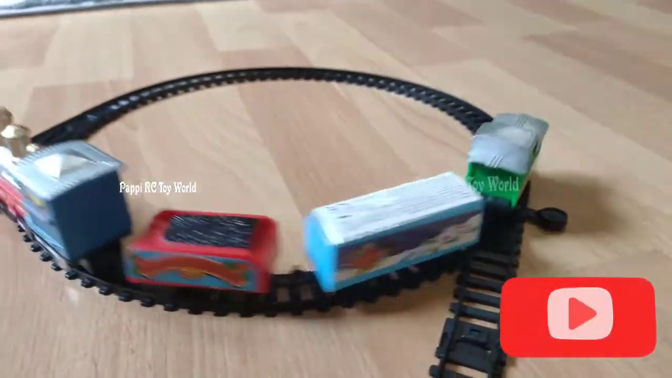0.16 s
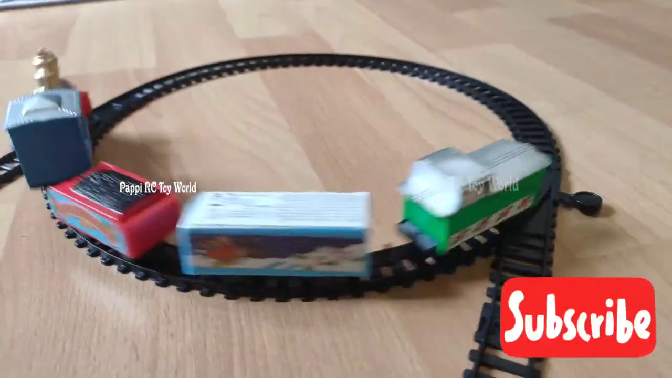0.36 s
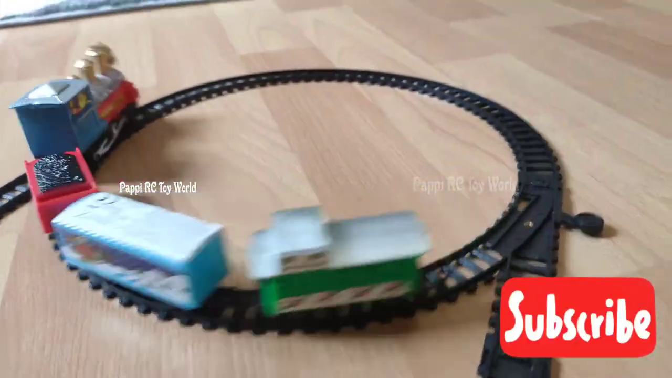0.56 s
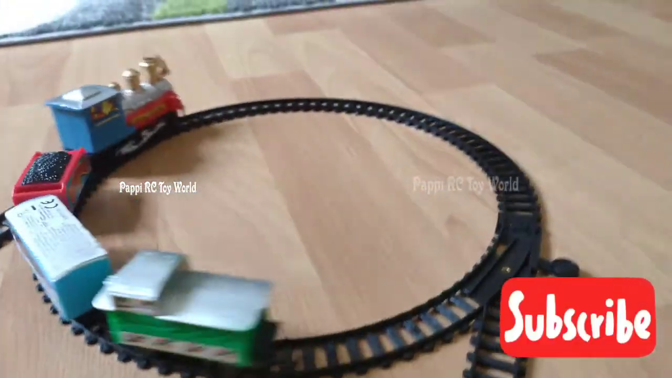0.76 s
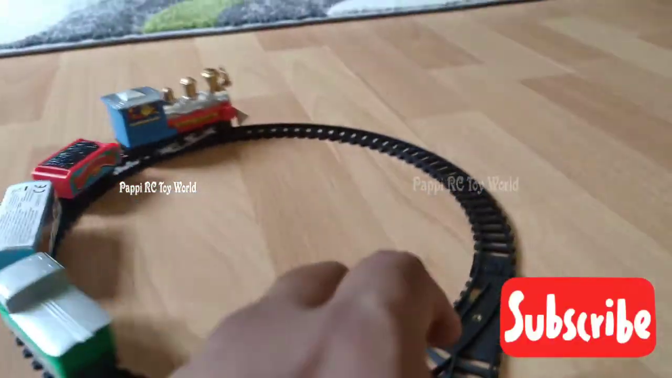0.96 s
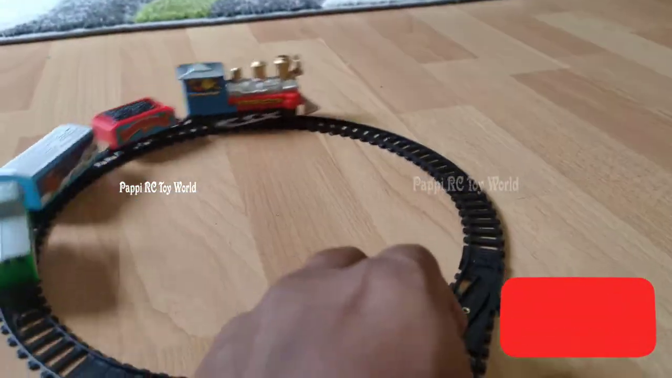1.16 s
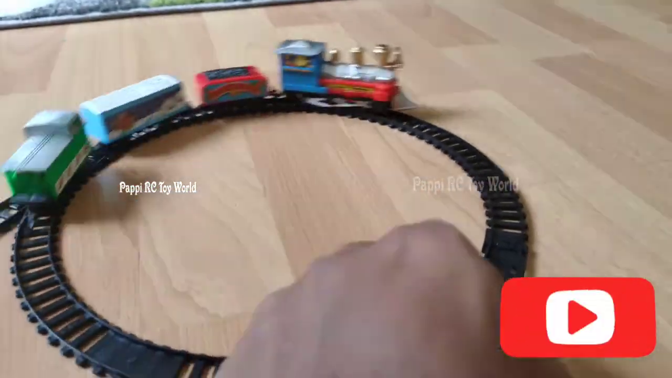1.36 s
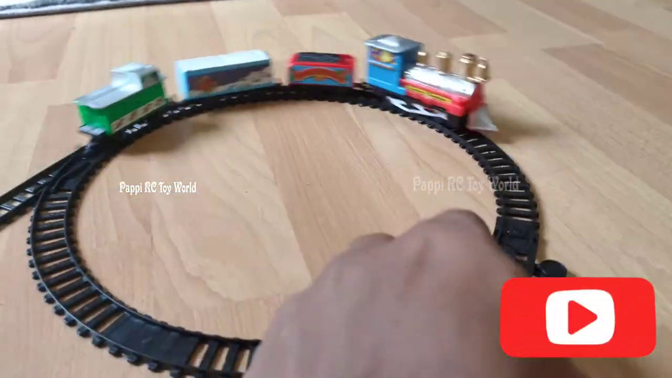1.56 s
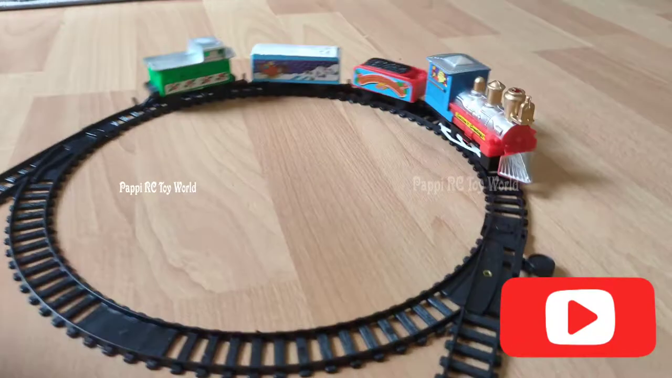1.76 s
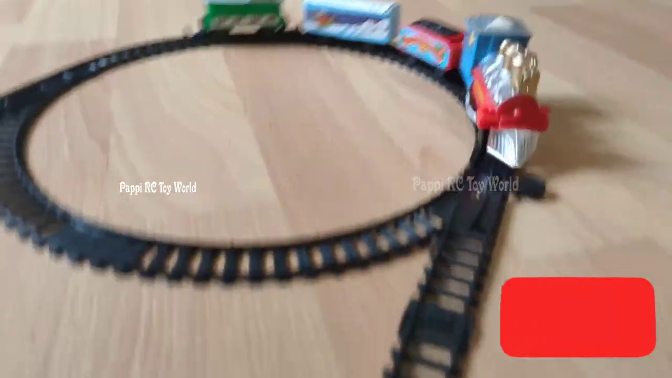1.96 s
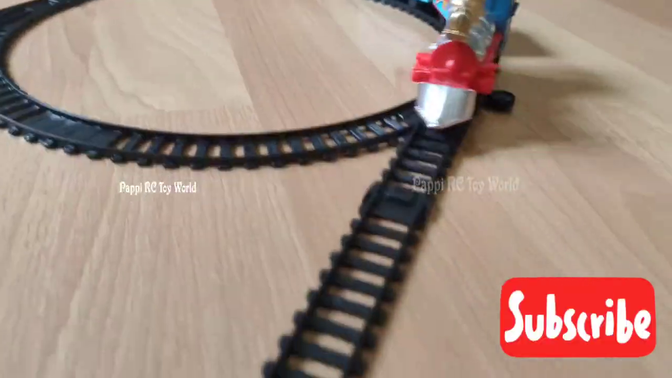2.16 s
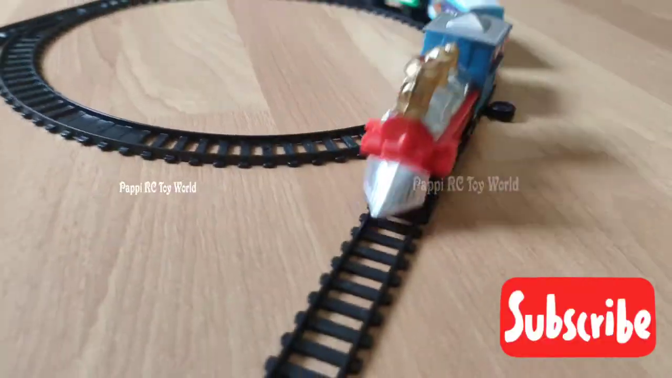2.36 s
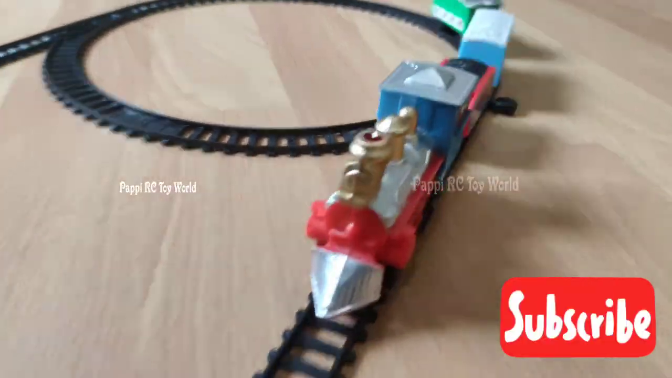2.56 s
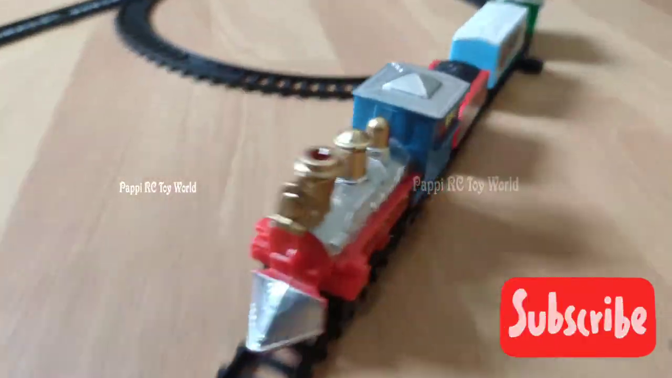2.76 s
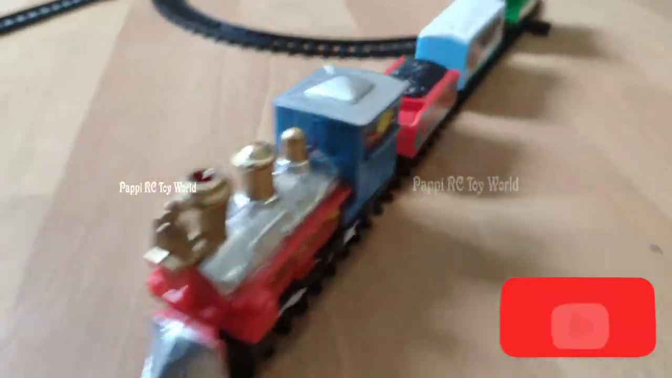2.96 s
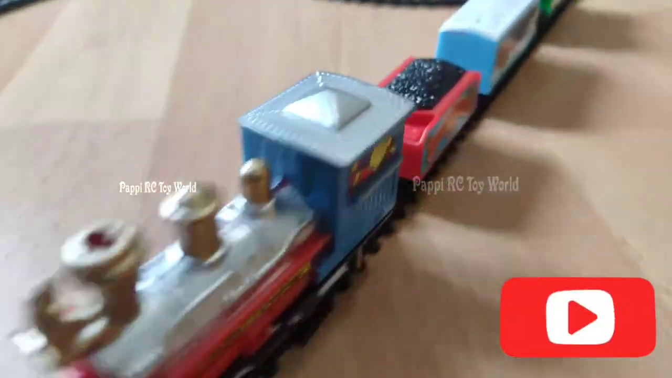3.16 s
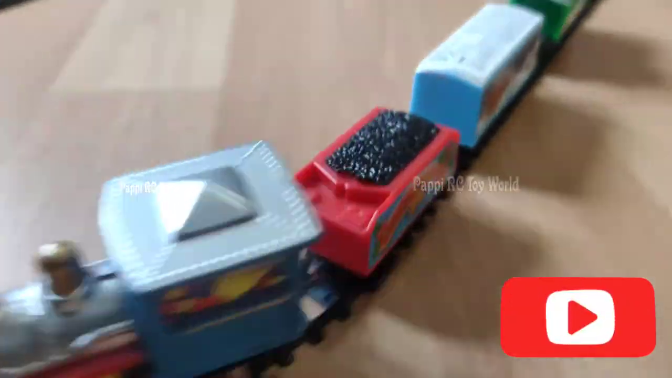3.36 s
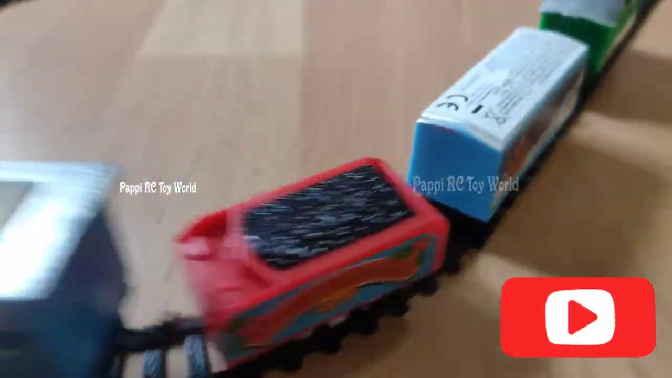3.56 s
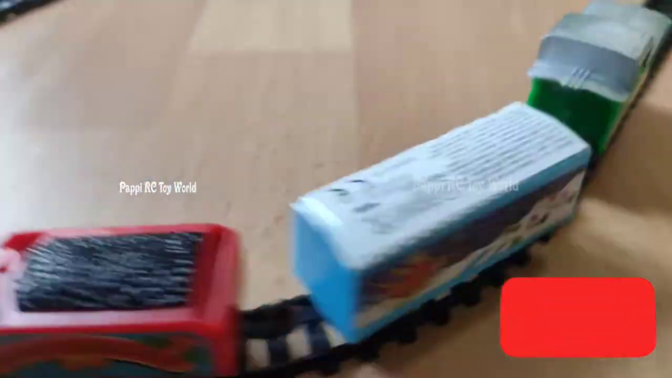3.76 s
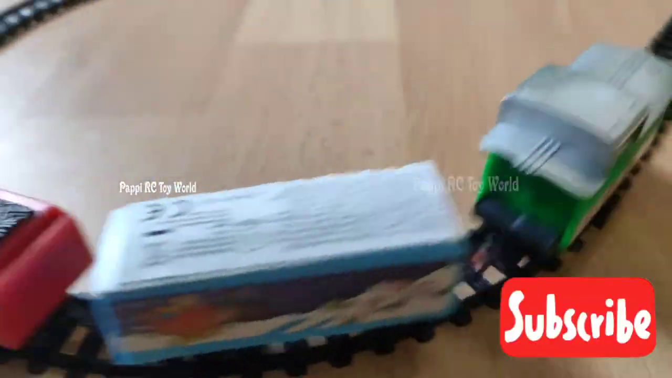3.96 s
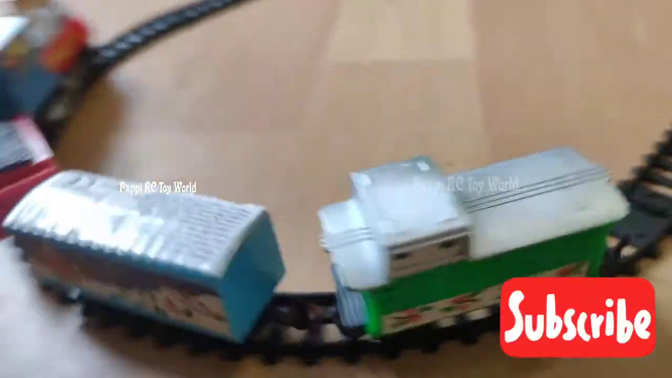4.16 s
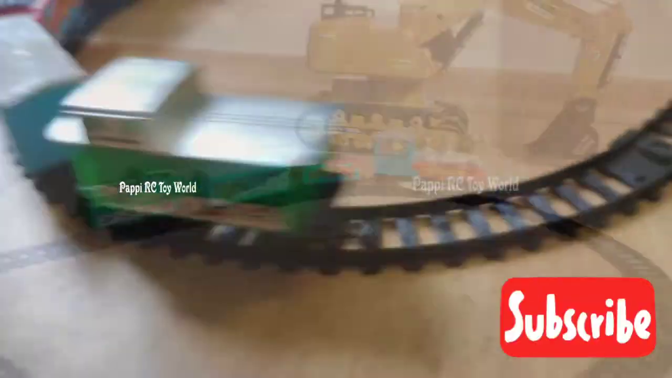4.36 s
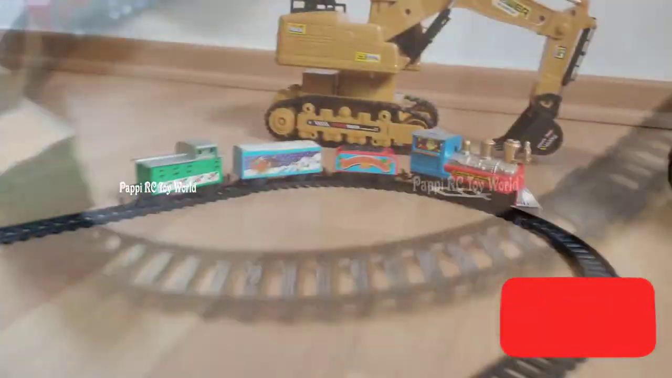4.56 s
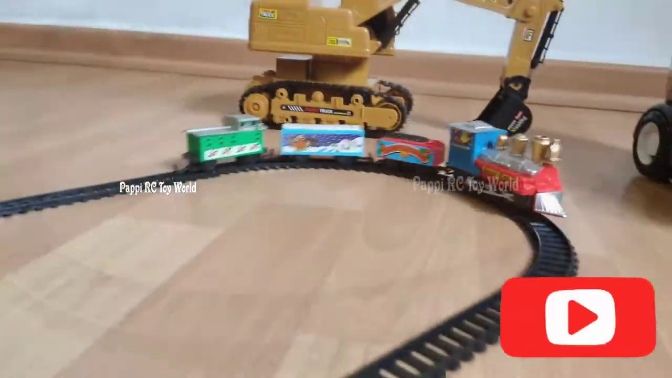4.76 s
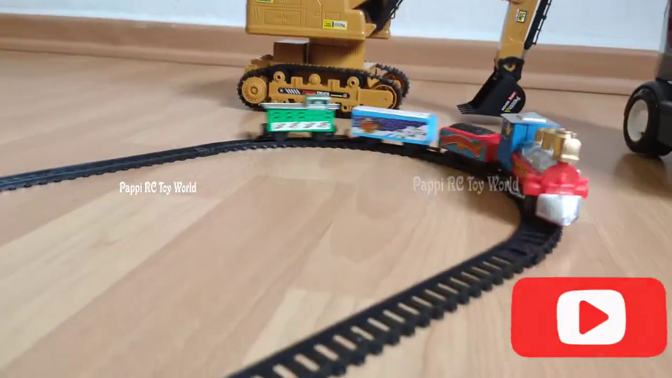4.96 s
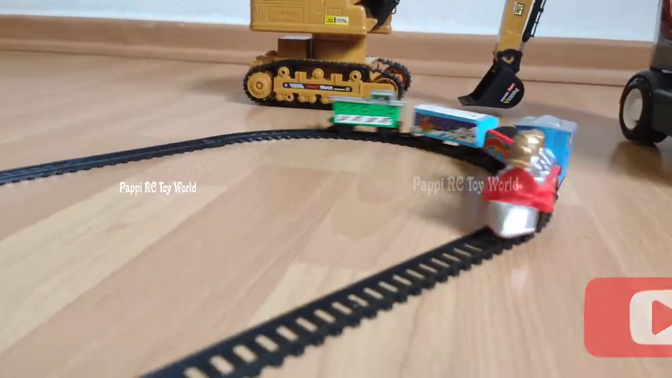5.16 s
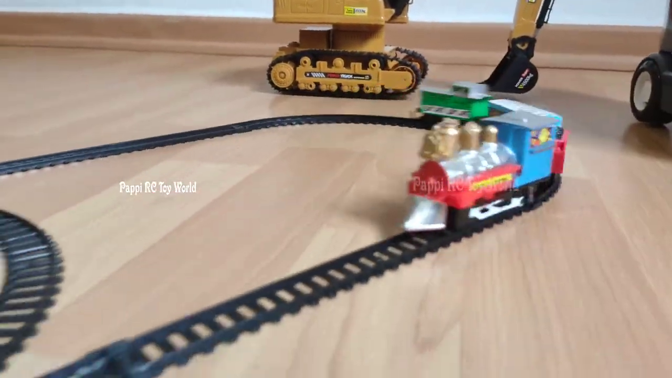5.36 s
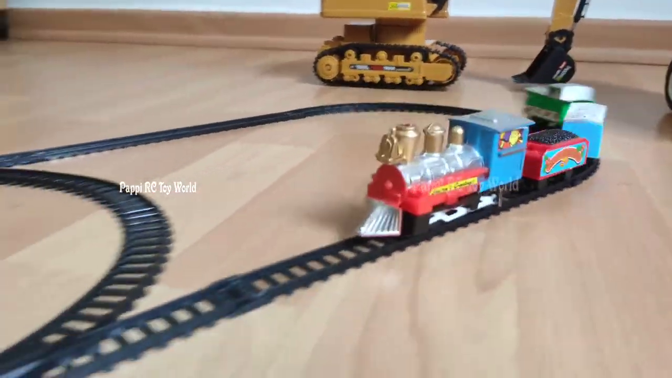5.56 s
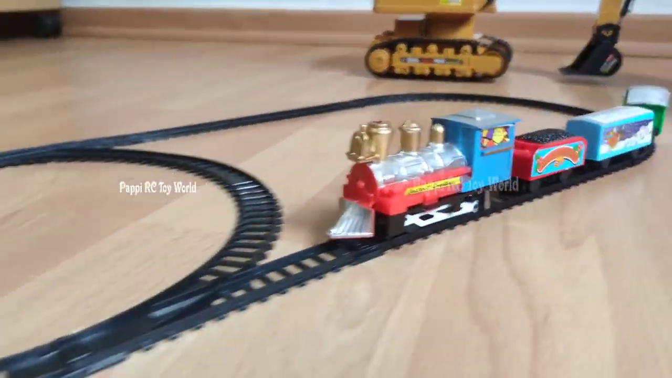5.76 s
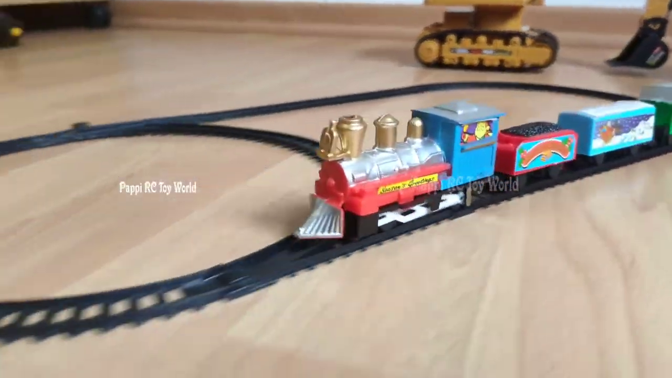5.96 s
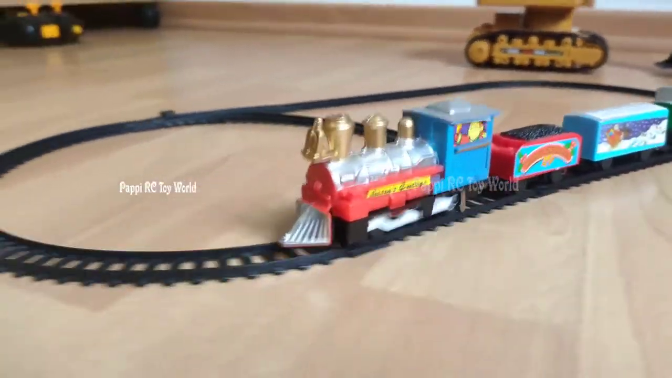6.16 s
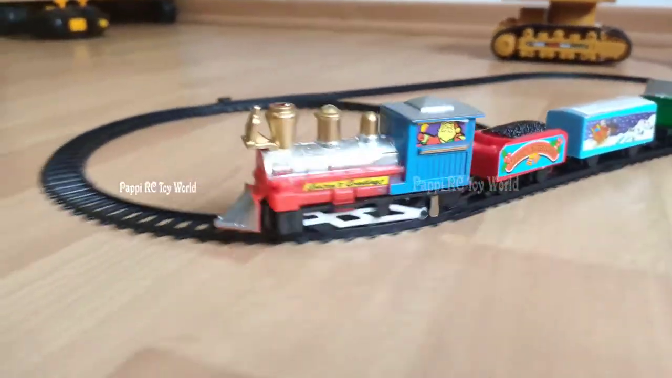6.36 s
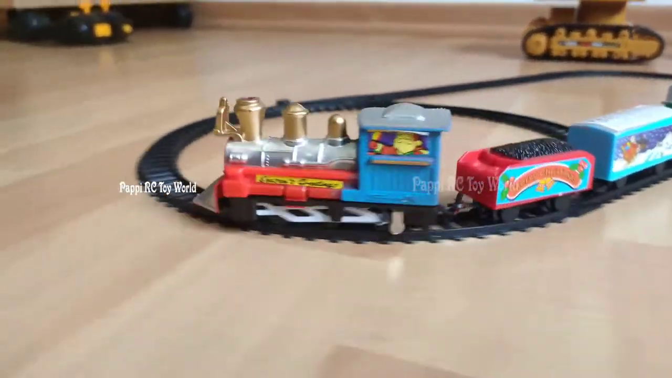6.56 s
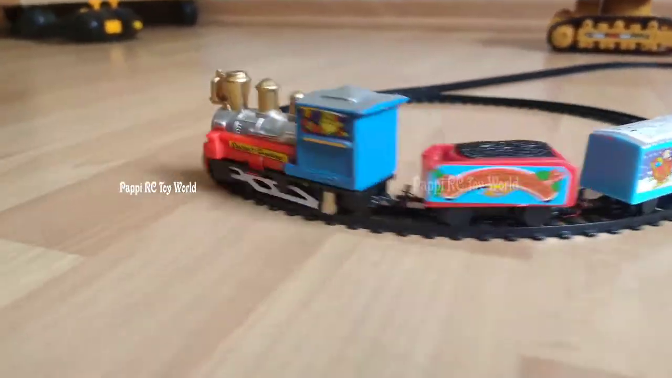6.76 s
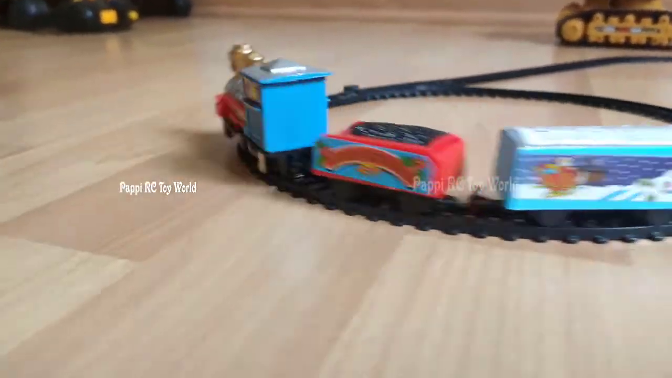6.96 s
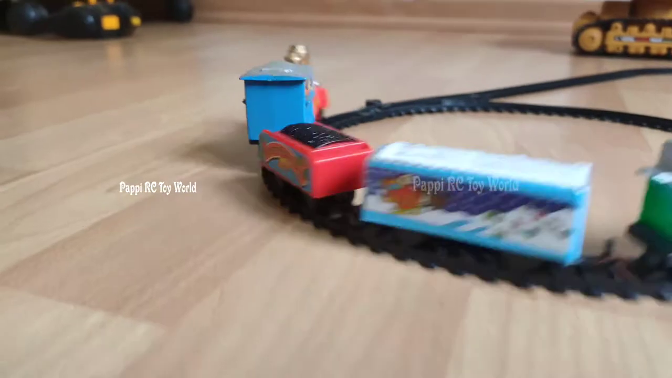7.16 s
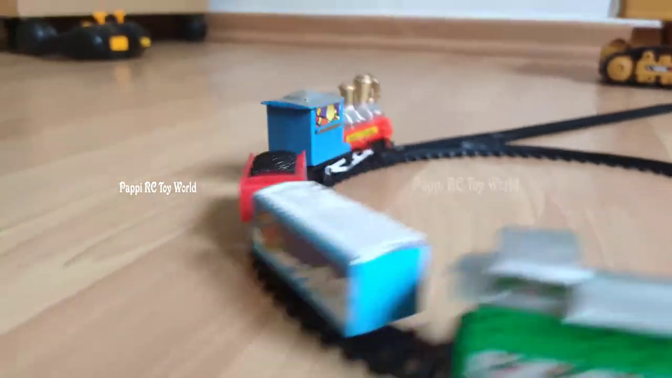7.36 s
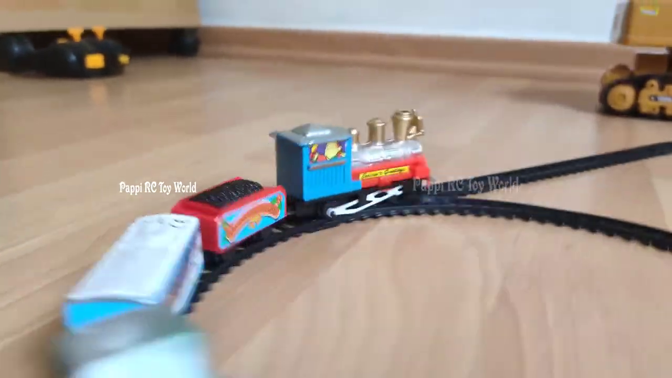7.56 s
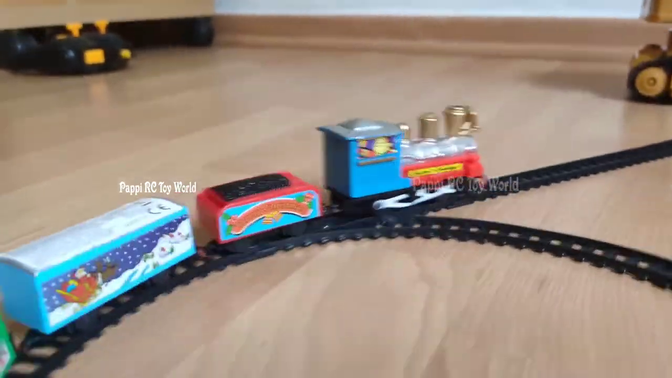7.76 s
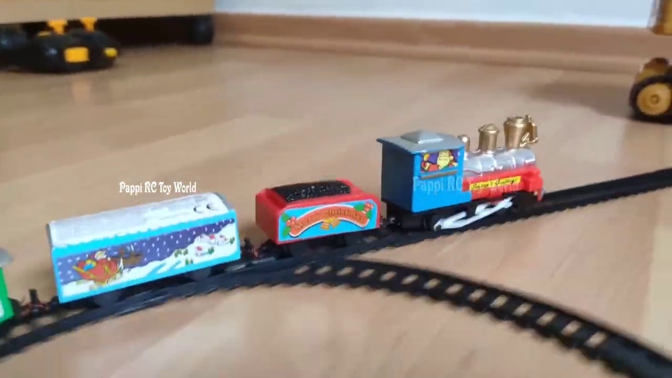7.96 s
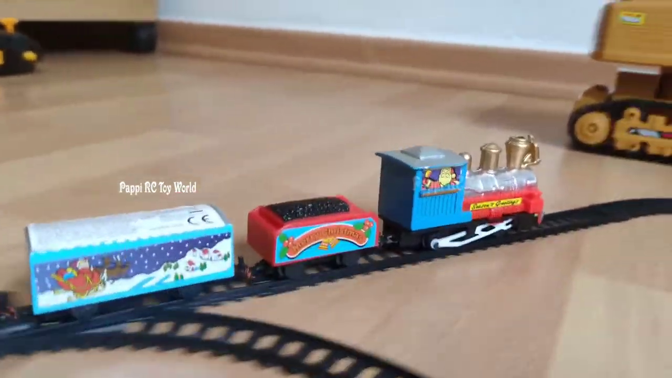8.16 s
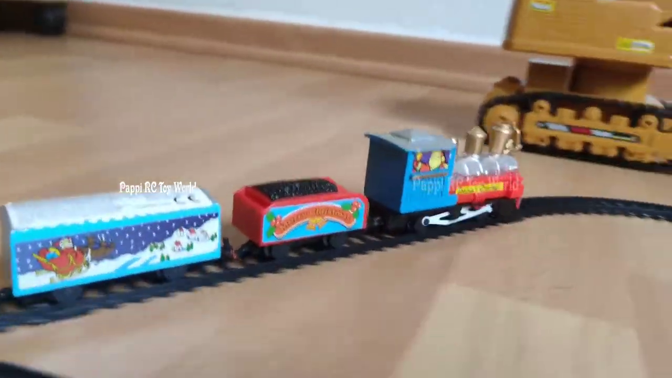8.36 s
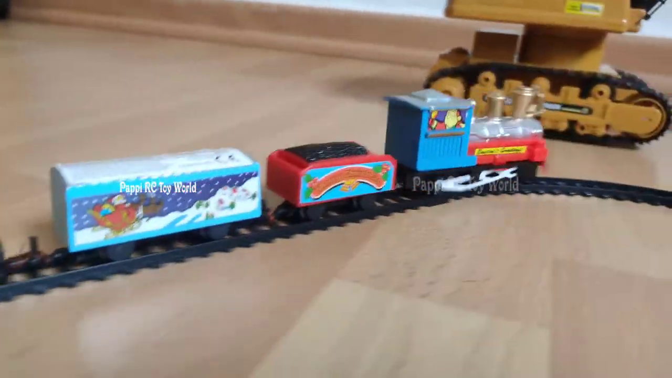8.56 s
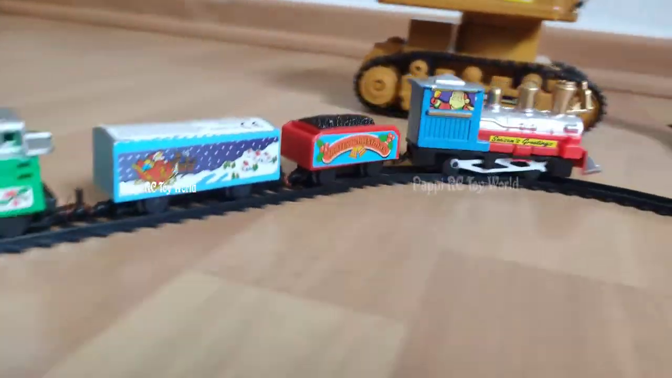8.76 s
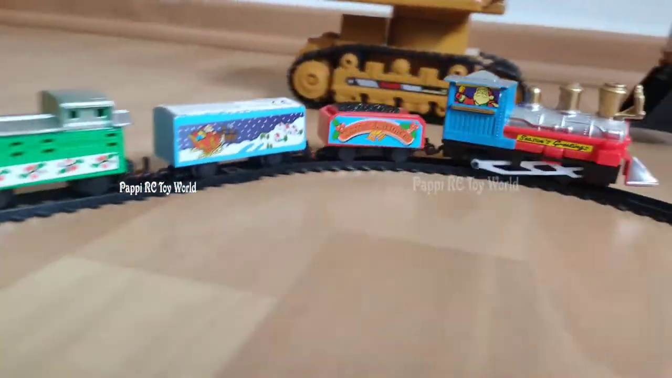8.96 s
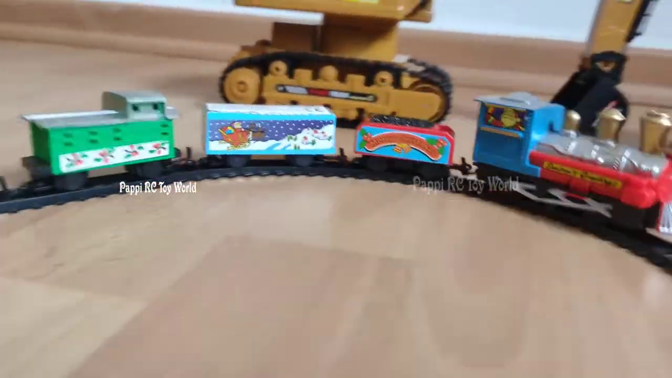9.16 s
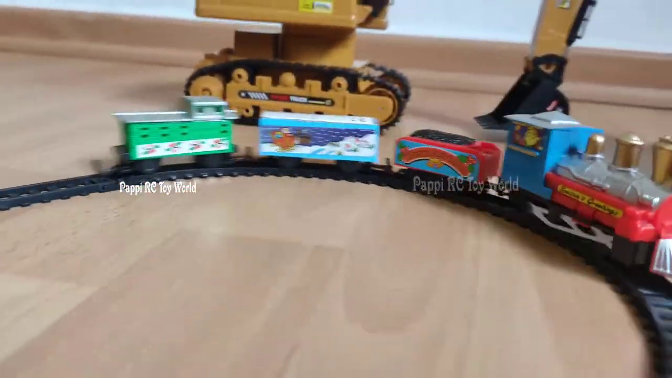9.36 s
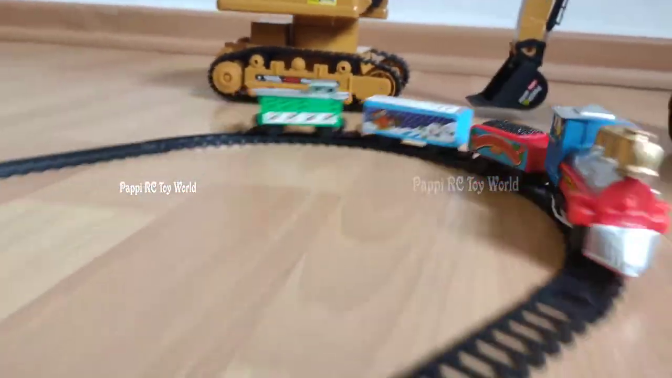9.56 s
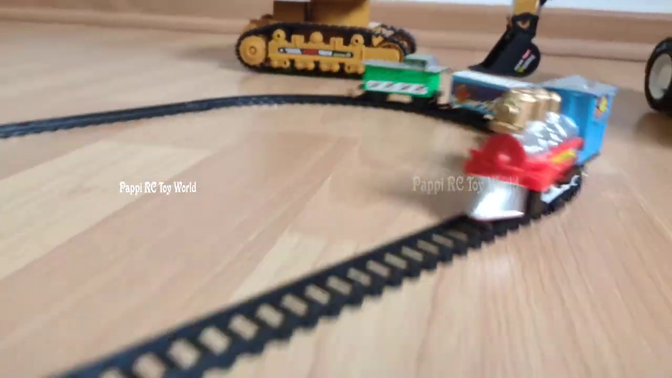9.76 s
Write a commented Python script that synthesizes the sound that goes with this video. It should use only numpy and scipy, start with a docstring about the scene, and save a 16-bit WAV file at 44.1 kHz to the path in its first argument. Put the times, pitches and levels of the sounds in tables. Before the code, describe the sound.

Close handheld phone pickup of a battery toy locomotive pulling light wagons. Fast dry gear rattle and skittering wheels dominate, thin at first with faint floor bumps, then closer and louder around three to four seconds, with tiny squeaks. Later, track and boards drum more fully under clusters of plastic clacks, with short room reflections and almost no background noise.

```python
"""A laminate floor in a small room: a battery toy train circles on plastic track close to a phone.
Gear teeth and loose rods, as trains of impacts, excite the resonances of the hollow engine.
Wheels clack over joints as bursts of bounces and flanges chirp in short noise grains; rolling
drums track, wagons and boards, and soft blows knock the floor. Diffuse echoes and faint air
noise surround it at two microphone ports."""
import sys
import numpy as np
from scipy import signal
from scipy.fft import rfft, irfft, next_fast_len
from scipy.io import wavfile
from scipy.ndimage import uniform_filter1d

SR = 44100
rng = np.random.default_rng(int(sys.argv[2]) if len(sys.argv) > 2 else 0)


def materialize(psi):
    """Save the field psi as 16-bit PCM at rate SR to the path in sys.argv[1].

    A 1-D psi becomes a single channel; in a 2-D psi each row is a channel.
    """
    bounded = np.clip(np.atleast_2d(psi).T, -1, 1)
    quanta = np.round(bounded * 32767).astype(np.int16)
    wavfile.write(sys.argv[1], SR, quanta)


N = 433062
TIME = np.arange(N) / SR

# resonances of the engine: pitch_hz, width_hz, relative_db
SHELL_MODES = [(1719, 64, -9), (2352, 120, -4.5), (1760, 4100, -9.5)]
GEARBOX_MODES = [(2426, 420, -2.5), (2950, 220, -1.5), (3564, 420, -2.5), (4600, 920, -9)]


def undb(db):
    """Decibels to gain."""
    return np.exp(np.asarray(db) * (np.log(10) / 20))


def unit(x):
    """Scale to rms 1."""
    return x / np.sqrt(np.mean(x ** 2))


def curves(table):
    """Each column after the first, interpolated over time."""
    s, *columns = np.transpose(table)
    return [np.interp(TIME, s, column) for column in columns]


def walk(rate_hz):
    """Smooth random signal of rms 1 with rate_hz new values a second."""
    hold = max(int(SR / rate_hz), 1)
    steps = np.repeat(rng.standard_normal(N // hold + 1), hold)
    return unit(uniform_filter1d(steps, hold)[:N])


def sway(rate_hz):
    """Random signal of rms 1, softly limited like a part with little play."""
    return unit(np.tanh(walk(rate_hz)))


def add(out, start_s, sound):
    """Mix a sound in at start_s."""
    i = max(int(start_s * SR), 0)
    out[i:i + len(sound)] += sound[:N - i]


def blend(dull, ringing, ratio_db):
    """Mix two sounds at a ratio in dB, keeping total power."""
    return (unit(dull) + undb(ratio_db) * unit(ringing)) / np.hypot(1, undb(ratio_db))


def colour(x, points, share=1):
    """Shape by a spectrum of (Hz, dB) points, its dB scaled by share."""
    hz, db = np.transpose(points)
    size = next_fast_len(N)
    f = np.maximum(np.fft.rfftfreq(size, 1 / SR), 1)
    gain_db = share * np.interp(np.log(f), np.log(hz), db)
    return irfft(rfft(x, size) * undb(gain_db), size)[:N]


def band_pass(order, low_hz, high_hz):
    """Butterworth band-pass sections."""
    return signal.butter(order, [low_hz, high_hz], btype="band", fs=SR, output="sos")


def low_pass(x, top_hz):
    """Steep elliptic low-pass."""
    return signal.sosfilt(signal.ellip(10, .2, 70, top_hz, fs=SR, output="sos"), x)


def ring(x, modes, low_hz, high_hz):
    """A body's parallel resonances, of alternating sign, radiating between two edges."""
    total = 0
    for k, (hz, width_hz, db) in enumerate(modes):
        b, a = signal.iirpeak(hz, hz / width_hz, fs=SR)
        total = total + (-1) ** k * undb(db) * signal.lfilter(b, a, x)
    return signal.sosfilt(band_pass(4, low_hz, high_hz), total)


def moving_ring(x, hz, width_hz):
    """A resonance of moving pitch, its one-pole filter applied twice for steep sides."""
    turn = np.exp(2j * np.pi * np.cumsum(hz) / SR)
    keep = np.exp(-np.pi * width_hz / SR)
    return unit((signal.lfilter([1], np.poly([keep, keep]), x / turn) * turn).real)


def contacts(rate_hz, scatter_db):
    """Tiny impacts at random moments, of uneven size and random sign."""
    count = int(rate_hz * N / SR)
    size = undb(scatter_db * np.clip(rng.standard_normal(count), -2, 2))
    size = size * rng.choice([-1, 1], count)
    return unit(np.bincount(rng.integers(0, N, count), size, N))


def engine(gear_db, wheel_db, shell_db, chassis_db):
    """Teeth and loose parts rattle in short flurries; returns body, gearbox and wheels."""
    # sharpest resonances: time_s, gearbox_ratio_db, wheel_ratio_db, wheel_pitch_hz
    ringing = [(0, -3, -2, 6060), (.8, -3.5, 0.5, 6140), (1.6, -6.5, 1, 5570), (2.15, 0.5, 9.5, 6160),
               (3.3, 3.5, 3.5, 6060), (4.5, -8.5, -4, 6190), (5.5, -6, -3, 6340), (6, -4, -5, 6070),
               (7.4, -4, -2, 6020), (8.2, -1, -10, 6070), (9.8, 0, -4.5, 6340)]
    # parts that tighten the mesh once a turn: mean_turns_per_s, depth_db
    throbs = [(10.8, 0.32), (21.6, 0.8), (43, 0.5), (106.4, 1.6)]
    # pitch_hz, width_hz, relative_db
    gear_ring = [(3357, 320, 0)]
    wheel_modes = [(5414, 800, -0.5), (6070, 925, -0.5), (6704, 700, -2.5), (7625, 430, -11)]
    chassis_modes = [(1190, 470, -6.0), (1300, 180, -15.0)]

    gear_ring_db, wheel_ring_db, wheel_hz = curves(ringing)
    travel_s = np.cumsum(1 + 0.023 * walk(4)) / SR  # the speed wavers with the load
    # off-centre gears tighten the mesh once a turn
    throb_db = sum(db * np.sin(2 * np.pi * hz * travel_s) for hz, db in throbs)
    load_db = 0.04 * sway(10)  # drag of the wagons
    flurry = unit(undb(throb_db + load_db + 1.4 * sway(130) + 2.5 * sway(450)))
    teeth = undb(-3.5) * gear_teeth(travel_s, rough_db=2.5)
    rods = undb(-3.5) * contacts(1500, scatter_db=3.0)  # coupling rods tap the frame

    def rattle():
        """Shared teeth, rods and flurries plus a part's own loose contacts."""
        return unit(teeth + rods + contacts(8000, scatter_db=3.5)) * flurry

    frame, box, shaft, rims, axles = (rattle() for _ in range(5))
    chassis = ring(shaft, chassis_modes, low_hz=896, high_hz=1380)
    shell = ring(frame, SHELL_MODES, low_hz=1378, high_hz=2457)
    body = unit(chassis) * undb(chassis_db - 0.5) + unit(shell) * undb(shell_db + 7.0)

    gear_dull = ring(box, GEARBOX_MODES, low_hz=2267, high_hz=5230)
    gear_sharp = ring(shaft, gear_ring, low_hz=2726, high_hz=4180)
    gearbox = blend(gear_dull, gear_sharp, gear_ring_db)

    # the wheels skitter on the rails as the engine shakes them
    skitter = unit(undb(0.79 * sway(45) + 1.4 * sway(220)))
    wheel_dull = ring(rims * skitter, wheel_modes, low_hz=4080, high_hz=8070)
    wheel_sharp = moving_ring(axles * skitter, wheel_hz, width_hz=790)
    wheels = blend(wheel_dull, wheel_sharp, wheel_ring_db)
    return body, gearbox * undb(gear_db + 1.0), wheels * undb(wheel_db - 2.0)


def gear_teeth(travel_s, rough_db):
    """One tick a tooth; backlash makes the ticks early or late."""
    mean_mesh_hz = 532
    teeth = np.floor(mean_mesh_hz * travel_s + .05 * walk(600))
    return unit(np.diff(teeth, prepend=0) * undb(rough_db * rng.standard_normal(N)))


def binding():
    """Rattle swells as flanges bind, eases as wagons run free; returns gearbox and wheel dB."""
    # middle_s, half_length_s, gearbox_change_db, wheel_change_db
    binds = [(0.154, 0.053, -4.5, -2), (0.786, 0.03, 1, 12), (1.022, 0.14, 3.5, 2.5), (1.698, 0.11, -6, -8),
             (2.247, 0.05, -4, -12), (2.41, 0.016, -12, -19), (2.501, 0.05, -5, -8), (2.688, 0.031, 4, 3.5),
             (2.746, 0.045, -3.5, -6), (2.902, 0.023, -9, -10), (2.927, 0.055, 4.5, 4.5),
             (3.482, 0.26, 5, 4), (3.588, 0.041, -8, -9), (3.995, 0.018, 7, 7.5), (4.074, 0.12, 2.5, -6),
             (4.158, .05, -6, -15), (4.196, 0.075, 6, 0.5), (4.91, 0.078, 2, 4.5), (5.448, 0.07, -3, -4),
             (6.076, 0.11, 3.5, 3), (6.895, 0.064, 2.5, 2.5), (6.994, 0.017, 3.5, 4),
             (7.278, 0.035, -11, -12), (7.304, 0.02, 9.5, -4), (7.64, 0.029, -5, 7),
             (7.699, 0.064, -6.5, -5), (8.117, 0.034, -0.5, 2), (8.178, 0.042, -5, -11),
             (8.649, 0.051, 4, 6)]
    gear, wheels = np.zeros((2, N))
    for middle_s, length_s, gear_db, wheel_db in binds:
        swell = np.hanning(int(2 * length_s * SR)) ** 2.0
        add(gear, middle_s - length_s, gear_db * swell)
        add(wheels, middle_s - length_s, wheel_db * swell)
    return gear, wheels


def joints(bounce_s, bright_db, body_db):
    """A wheel scrapes over a joint: tiny bounces swell and die within milliseconds."""
    # levels before the common trims: time_s, body_peak_db, bright_peak_db
    clack_table = [(0.7894, -24, -31), (0.947, -17, -36), (0.9898, -21, -42), (2.174, -16, -24),
                   (2.426, -20, -25), (2.673, -17, -36), (2.8759, -11, -29), (3.39, -5.5, -33),
                   (5.505, -32, -23), (5.529, -27, -22.5), (5.545, -11, -31), (6.038, -15, -31),
                   (6.087, -14, -26), (6.899, -20, -18.5), (6.92, -16, -28), (6.9965, -14, -28),
                   (7.157, -15, -28), (7.3, -22, -26), (7.5123, -29, -20.5), (7.614, -18, -37.5),
                   (7.638, -6, -22), (8.1174, -19.5, -23), (8.277, -9, -28), (8.335, -6.5, -26),
                   (8.6389, -16.5, -41), (8.7036, -15, -28), (9.134, -12, -19.5), (9.2535, -8, -27)]
    bright_modes = [(6400, 310, 5.0), (5060, 1500, -7.0)]
    out, t = np.zeros(N), TIME[:SR // 20]
    swell = (t / bounce_s) ** 2 * np.exp(-t / bounce_s)
    for s, peak_db, ring_db in clack_table:
        bounces = rng.standard_normal(len(t)) * (rng.random(len(t)) < .25) * swell
        bright = ring(bounces, bright_modes, low_hz=4460, high_hz=8000)
        body = ring(bounces, [*SHELL_MODES, *GEARBOX_MODES], low_hz=1500, high_hz=5260)
        bright = bright / abs(bright).max() * undb(ring_db + bright_db)
        body = body / abs(body).max() * undb(peak_db + body_db)
        add(out, s - bounce_s, bright + body)
    return out


def squeaks(width_hz):
    """A flange sticks and slips along the rail in tight bends: a grainy chirp in one resonance."""
    # start_s, length_s, pitch_hz, level_db
    chirp_table = [(4.018, 0.096, 5940, -45), (4.29, 0.055, 5440, -43), (4.36, 0.043, 5450, -42),
                   (4.345, 0.047, 2520, -47), (7.366, 0.099, 3030, -40.5), (7.471, 0.075, 2730, -42)]
    out = np.zeros(N)
    for s, length_s, hz, db in chirp_table:
        swell = signal.windows.tukey(int(length_s * SR), .5)
        slips = rng.standard_normal(len(swell)) * (rng.random(len(swell)) < .1)
        chirp = ring(slips, [(hz, width_hz, 0)], hz - 2 * width_hz, hz + 2 * width_hz)
        add(out, s, unit(chirp) * swell * undb(db))
    return out


def rolling(track_db, track_hz, board_db, wagon_db):
    """Wheel bumps drum the hollow track and wagon bodies, and the boards beneath; returns both."""
    # pitch_hz, width_hz, relative_db
    wagon_modes = [(383, 54, -6.5), (556, 160, -8), (694, 90, -3), (920, 380, -6.5)]
    board_modes = [(90, 82, -8), (122.7, 23.7, 3), (156.5, 23.3, 1), (209, 39, -0.5), (327, 250, -11)]
    shake = undb(1.1 * sway(28) + 0.3 * sway(9))
    seating = undb(1.5 * sway(16))  # track loose in places, firm in others
    smear_hz = 0.57 * (track_hz - track_hz.min())  # higher pieces have a less clear pitch
    pitch_hz = track_hz + 7 * walk(8) + smear_hz * walk(150)
    track = moving_ring(contacts(400, scatter_db=1.5) * shake * seating, pitch_hz, width_hz=58)
    wagons = ring(contacts(1500, scatter_db=3.0) * shake, wagon_modes, low_hz=271, high_hz=1100)
    boards = ring(contacts(1500, scatter_db=2.0) * shake, board_modes, low_hz=61, high_hz=527)
    drone = unit(track) * undb(track_db - 0.3) + unit(wagons) * undb(wagon_db - 1.4)
    return drone, unit(boards) * undb(board_db + 1.5)


def knocks(knock_db, tail_db, hollow_db, width_hz):
    """A soft blow on the floor: one push, then a short dull ring of boards and track."""
    # levels before the common trims: start_s, thud_peak_db, t60_s, track_peak_db, track_pitch_hz
    blow_table = [(0.06, -62, 0.3, -60, 940), (0.449, -55, 0.15, -55.5, 617), (0.653, -53, 0.13, -66, 620),
                  (0.788, -52, 0.25, -54.5, 662), (0.885, -40, 0.3, -57.5, 920),
                  (0.915, -49, 0.16, -66, 650), (1.068, -61, 0.13, -50.5, 736),
                  (1.159, -75, 0.13, -60, 950), (1.189, -73, 0.079, -51.5, 680),
                  (1.335, -52.5, 0.22, -56.5, 700), (1.488, -63, 0.1, -76, 900),
                  (1.621, -64, 0.17, -61, 920), (1.76, -65, 0.12, -67, 700), (2.01, -55.5, 0.57, -68, 880),
                  (2.147, -53, 0.2, -71, 780), (2.425, -49, 0.16, -72, 686), (2.445, -50, 0.22, -61.5, 730),
                  (2.679, -50.5, 0.14, -63, 665), (2.8, -60, 0.12, -77, 653), (2.94, -52.5, 0.17, -64, 650),
                  (3.052, -50, 0.089, -71, 650), (3.146, -45, 0.11, -62, 650), (3.507, -39, 0.23, -47, 780),
                  (8.571, -29.5, 0.079, -51, 687)]
    out, t = np.zeros(N), TIME[:SR // 2]
    for s, db, t60_s, track_db, hz in blow_table:
        tail = rng.standard_normal(len(t)) * undb(-60 * t / max(t60_s, .01))
        push = (t == 0) + undb(tail_db) * tail
        thud = ring(push, [(100, 50, 2), (293, 150, 0.33)], low_hz=45, high_hz=473)
        hollow = ring(push, [(hz, width_hz, 0)], low_hz=530, high_hz=1170)
        thud = thud / abs(thud).max() * undb(db + knock_db)
        hollow = hollow / abs(hollow).max() * undb(track_db + hollow_db)
        add(out, s, thud + hollow)
    return out


def ticks():
    """Sharp single-sample clicks on the left only."""
    # time_s, impulse_db
    tick_table = [(2.174, -28), (2.183, -32), (2.189, -43)]
    out = np.zeros((2, N))
    for s, db in tick_table:
        add(out[0], s, undb([db]))
    return out


def ports(x, lag_ms):
    """Sound reaches the left port later than the right by the lag."""
    return np.array([np.interp(TIME + side * lag_ms / 2000, TIME, x) for side in (-1, 1)])


def hollowed(x):
    """Moving notch where sound off the floor cancels the direct sound."""
    # time_s, notch_hz, share_cancelled (0-1)
    notch_table = [(.3, 850, 0.8), (.8, 1480, 0.35), (1.3, 1160, .7), (2.1, 1080, 0.7), (3.0, 820, 0.34),
                   (3.5, 760, 0.5), (3.8, 770, 1), (4.1, 800, 0.5), (4.25, 1460, 0.7), (4.6, 1190, .75),
                   (5.0, 1270, .75), (7.2, 1320, 0.16), (7.85, 1510, 0.6), (8.45, 1460, 0.4),
                   (9.1, 1300, 0)]
    width_hz = 200
    hz, share = curves(notch_table)
    turn = np.exp(2j * np.pi * np.cumsum(hz) / SR)
    keep = np.exp(-np.pi * width_hz / SR)
    band = 2 * (signal.lfilter([1 - keep], [1, -keep], x / turn) * turn).real
    return x - np.clip(share, 0, 1) * band


def shade(x, left_minus_right_db, low_hz, high_hz):
    """The phone's body favours one port within a band."""
    band = signal.sosfiltfilt(band_pass(3, low_hz, high_hz), x)
    return x + band * (undb(np.outer([.5, -.5], left_minus_right_db)) - 1)


def echoes(x, t60_s, delay_s, changes_per_s):
    """Diffuse noise-tail reflections, unrelated at the ports; the pattern shifts as parts move."""
    hop = SR // changes_per_s
    t, window = TIME[:2 * hop], np.sin(np.linspace(0, np.pi, 2 * hop))
    decay = undb(-60 * t / t60_s) * (t > delay_s)  # tail stops after two hops
    starts = np.arange(0, N + hop, hop)
    pieces = np.pad(x, (hop, 2 * hop))[starts[:, None] + np.arange(2 * hop)] * window
    out = np.zeros((2, N + 5 * hop))
    for channel in out:
        responses = decay * rng.standard_normal((len(starts), len(t)))
        tails = signal.fftconvolve(pieces, responses, axes=1)
        for start, tail in zip(starts, tails):
            channel[start:start + len(tail)] += tail
    return out[:, hop:hop + N] / np.linalg.norm(decay)


def still_air():
    """Faint shaped noise, partly common to both ports."""
    # spectrum: frequency_hz, relative_density_db
    air_spectrum = [(25, -83.5), (60, -87.5), (110, -84), (200, -102), (400, -93), (1200, -99),
                    (8000, -106)]
    air = np.array([unit(colour(rng.standard_normal(N), air_spectrum)) for _ in range(2)])
    return undb(-73) * (air + air.mean(axis=0))


def scene():
    """The train reaches two ports directly, off floor and nearby toys, and by way of the walls."""
    # engine nears twice and turns its sides; levels before trims: time_s, gearbox_db,
    # then relative to gearbox: wheels_db, shell_db, open_underside_db
    run = [(0, -40.5, -4, -5, -17.5), (1.0, -45.5, -2.5, -4.5, -16.5), (1.75, -46, -4.5, -6, -32),
           (2.2, -46, -0.5, -5, -36), (2.55, -42.5, 0, -3.5, -21), (2.8, -40.5, 0, -6.5, -8),
           (3.4, -40.5, -1, -5, -9.5), (4.05, -40.5, -1.5, -8, -10), (4.35, -49, -3, -9, -15),
           (4.65, -48.5, 0, -7, -10), (5.15, -45.5, -5, -10, -7), (5.6, -48, 2.5, -6, -10),
           (6.5, -43, 0, -6.5, -7), (6.95, -40.5, 1, -8.5, -8), (7.7, -40.5, -0.5, -7, -11.5),
           (8.35, -38.5, -4.5, -9.5, -15), (9.2, -42.5, -0.5, -7.5, -12), (9.8, -42, -7.5, -11, -16)]
    # port favoured, left minus right: time_s, wheels_db, gearbox_db, underside_db
    pan = [(0, 2, 0, -9), (.24, 2.5, 0, -13), (.78, -6, -1.5, -19.5), (1.1, -14, -2.5, -18.5),
           (1.5, -6.5, -1, -22), (1.85, -1.5, 2.5, -1), (2.2, 2, 1, 0), (3.3, -1.5, 2, -4.5),
           (4.15, -2.5, 2, -7), (4.37, 5.5, 0, -3), (4.66, -3, 1, 6), (5.1, 2.5, -2, 7.5), (5.57, 3, 0, 0),
           (6.17, 2.5, 1, -0.5), (7.2, 1, 2, 0.5), (7.7, -2, -3, -3.5), (8.4, -2.5, -4, 0),
           (9.3, -2.5, -1, 1.5), (9.8, 2, -2, 4)]
    # lag of the left port: time_s, gearbox_and_wheels_ms, shell_ms
    bearing = [(0, 0.3, 0.23), (1.2, 0.25, 0.41), (1.8, 0.17, 0.16), (2.4, 0.032, 0.29),
               (3.2, -0.047, 0.19), (3.7, 0.37, 0.42), (4.45, 0.29, 0.28), (4.8, 0.087, 0.15),
               (5.2, -0.0047, -0.0045), (5.5, -0.13, -0.13), (6.8, -0.13, -0.077), (7.2, 0.014, 0.098),
               (7.45, 0.35, 0.15), (7.8, 0.25, 0.35), (8.5, 0.31, 0.31), (9.2, 0.34, 0.13),
               (9.8, -0.046, 0.034)]
    # hollow track, each piece at its own pitch; level before trim: time_s, drone_db, pitch_hz
    drone = [(.3, -90, 607), (.5, -65, 620), (1.25, -57, 661), (1.6, -68, 649), (1.95, -76, 654),
             (2.95, -87, 625), (3.15, -58.5, 613), (3.9, -55.5, 607), (4.6, -55.5, 640), (5.3, -49, 636),
             (5.85, -53, 643), (6.05, -53.5, 718), (6.8, -46.5, 780), (7.5, -50, 763), (8.1, -59, 650),
             (8.55, -50.5, 621), (9.2, -43, 623), (9.8, -45.5, 624)]
    # floor hardly moves under the first loop, booms later; before trims: time_s, boards_db, wagons_db
    roll = [(0, -92, -86), (1.1, -92.5, -77), (2.0, -90, -86), (3.05, -77, -78), (3.18, -60.5, -54.5),
            (3.55, -60.5, -46.5), (4.25, -67.5, -60.5), (4.9, -54.5, -50), (6.9, -47.5, -46.5),
            (7.9, -53, -47.5), (9.2, -49, -43), (9.8, -51.5, -43)]

    gear_db, wheel_db, shell_db, chassis_db = curves(run)
    wheel_pan_db, gear_pan_db, low_pan_db = curves(pan)
    lag_ms, shell_lag_ms = curves(bearing)
    grind_db, squeal_db = binding()
    body, gearbox, wheels = engine(
        gear_db + grind_db,
        gear_db + wheel_db + squeal_db,
        gear_db + shell_db + 0.36 * grind_db,
        gear_db + chassis_db)
    rail = joints(bounce_s=0.001194, bright_db=-5.5, body_db=-17.5) + squeaks(width_hz=350)
    track, boards = rolling(*curves(drone), *curves(roll))
    boards = boards + knocks(knock_db=-3.5, tail_db=-17.5, hollow_db=4.5, width_hz=110)

    # wheels lie under the bodies, so less of them arrives directly
    direct = ports(undb(-4.0) * gearbox + undb(-5.5) * wheels + rail, lag_ms)
    direct = direct + ports(undb(-5.46) * body, shell_lag_ms) + undb(-2.0) * track

    body_echo = undb(-10) * body
    to_near = body_echo + undb(-3.0) * gearbox + undb(2.5) * wheels
    to_near = to_near + undb(-7.0) * rail + undb(-13) * track
    near = echoes(to_near, t60_s=0.037, delay_s=.0004, changes_per_s=45)
    to_walls = body_echo + undb(-4.5) * (gearbox + wheels + rail)
    to_walls = to_walls + undb(-7) * track + undb(-10.5) * boards
    walls = echoes(to_walls, t60_s=1.0, delay_s=.007, changes_per_s=5)

    heard = hollowed(direct + near + walls) + boards
    heard = shade(heard, wheel_pan_db, low_hz=4900, high_hz=7960)
    heard = shade(heard, gear_pan_db, low_hz=2340, high_hz=4900)
    return shade(heard, low_pan_db, low_hz=780, high_hz=1190) + still_air()


def record(dry):
    """Each port has its own colour; the phone cuts the top, and only the bright ticks reach higher."""
    # frequency_hz, left_minus_right_db
    port_colour = [(100, -1), (1700, 1), (2500, -3.5), (3300, 2.5), (4800, 2.5), (5500, 9), (6200, 13),
                   (6900, 5), (7700, -10)]
    top_hz, tick_top_hz = 7850, 12000
    coloured = np.array([colour(x, port_colour, share) for x, share in zip(dry, (.5, -.5))])
    return low_pass(coloured, top_hz) + low_pass(ticks(), tick_top_hz)


dry = scene()
out = record(dry)
materialize(out)
```